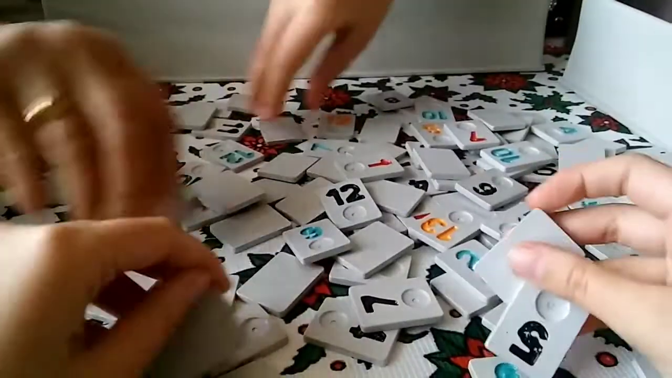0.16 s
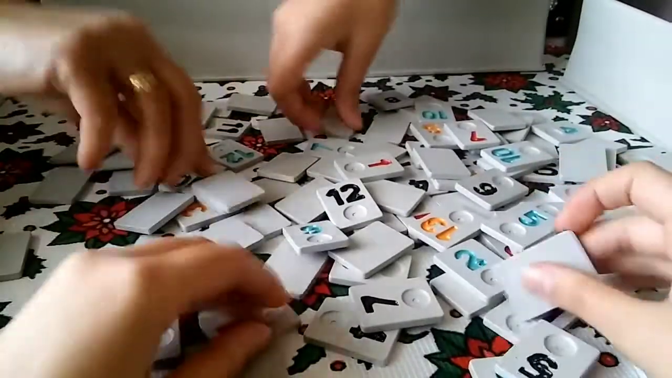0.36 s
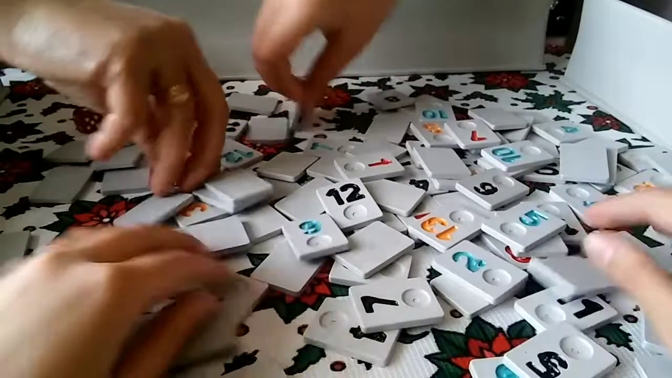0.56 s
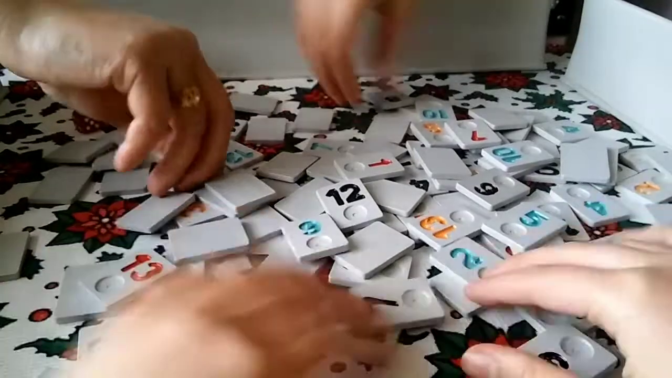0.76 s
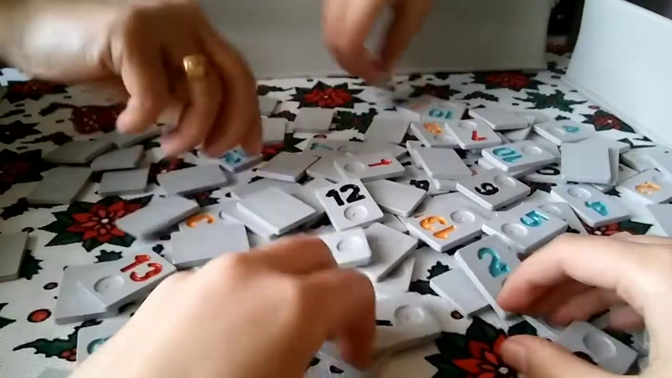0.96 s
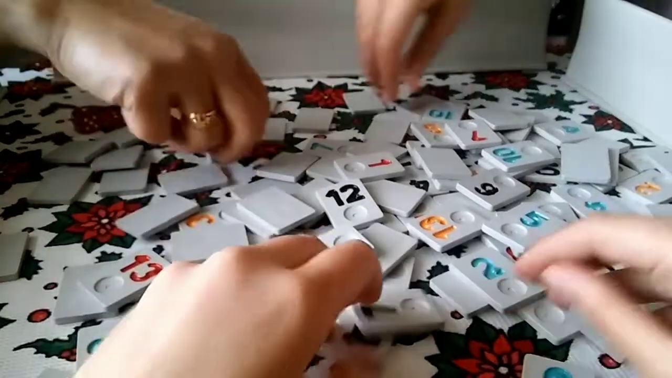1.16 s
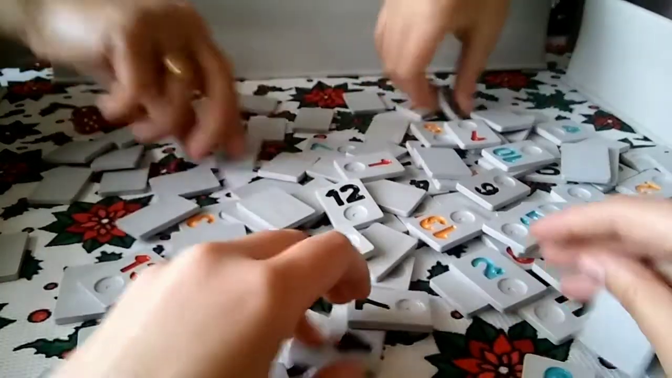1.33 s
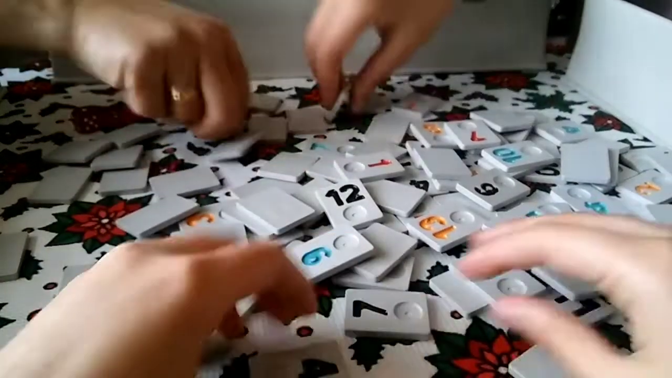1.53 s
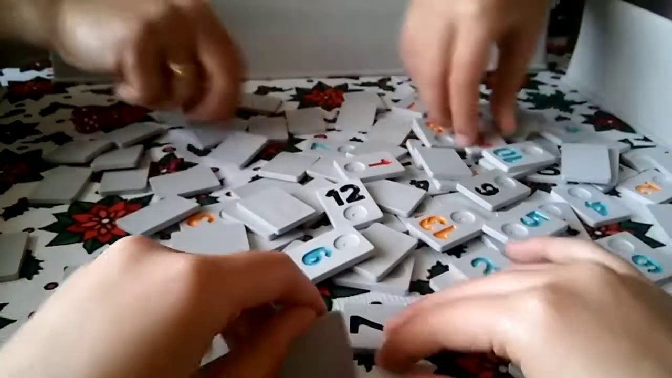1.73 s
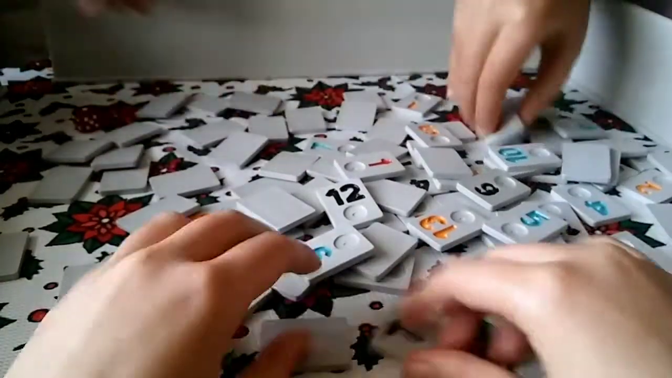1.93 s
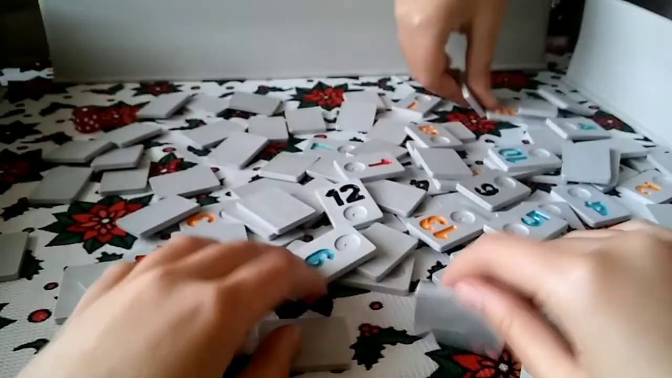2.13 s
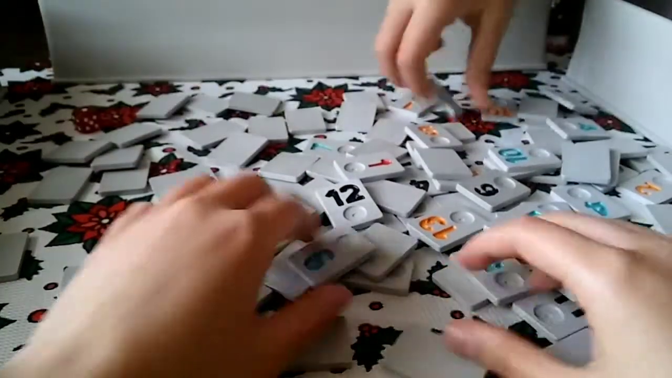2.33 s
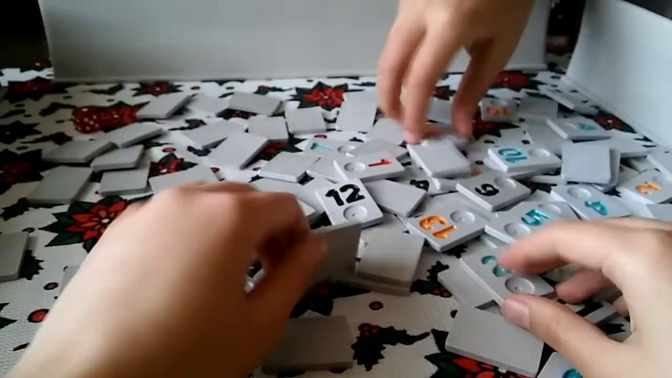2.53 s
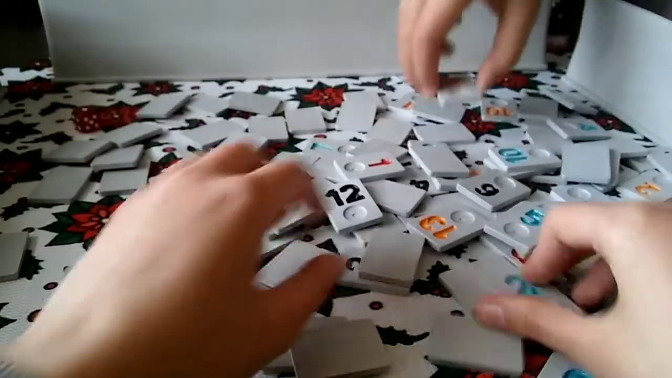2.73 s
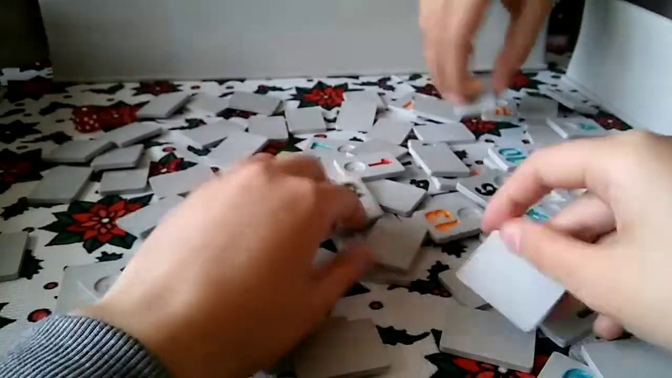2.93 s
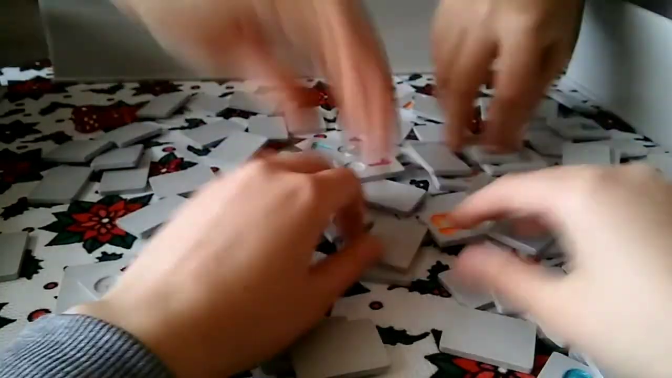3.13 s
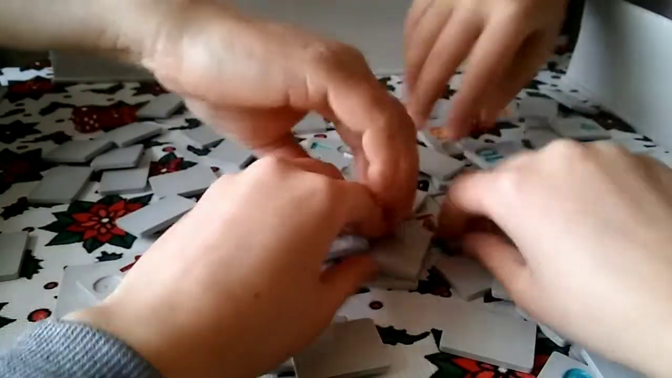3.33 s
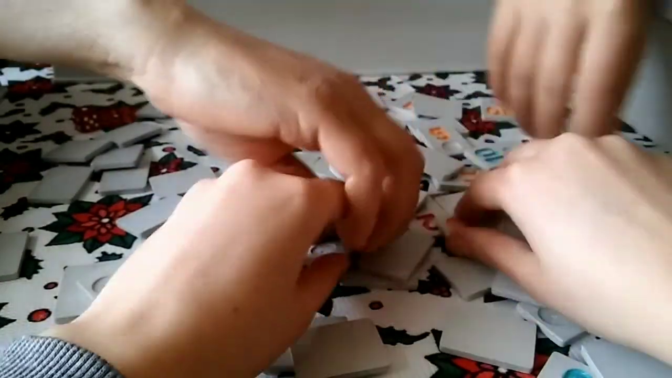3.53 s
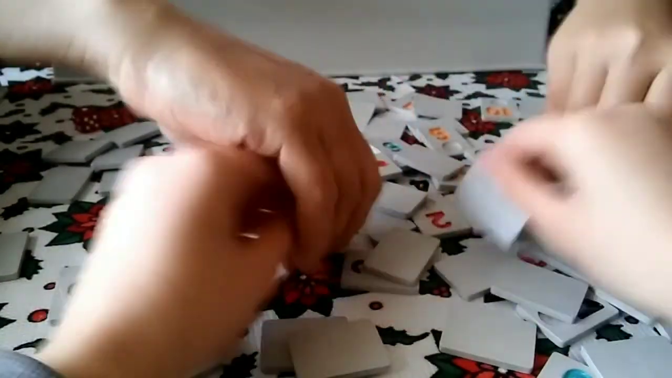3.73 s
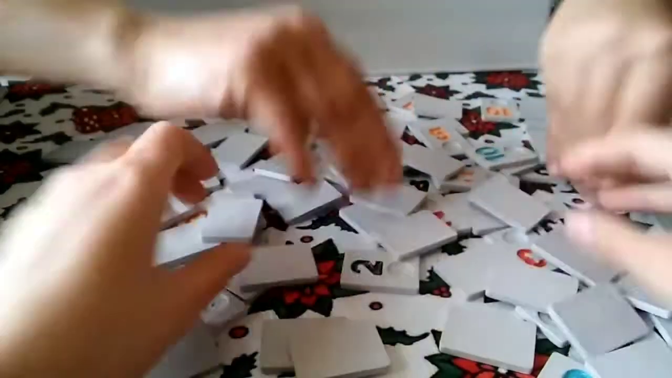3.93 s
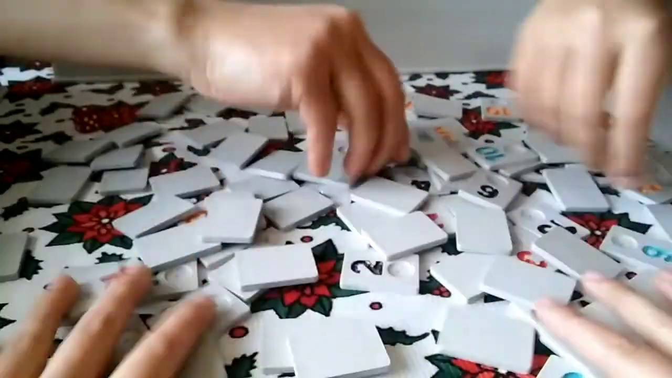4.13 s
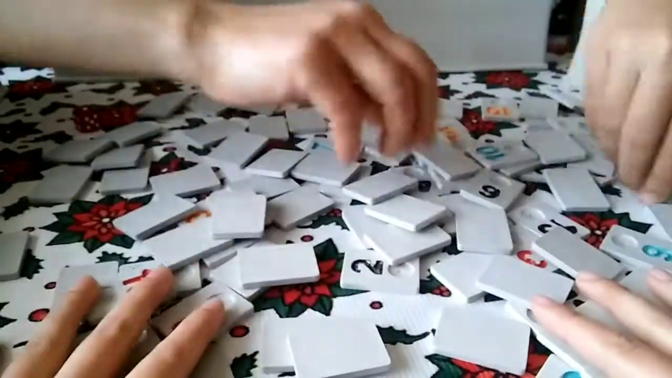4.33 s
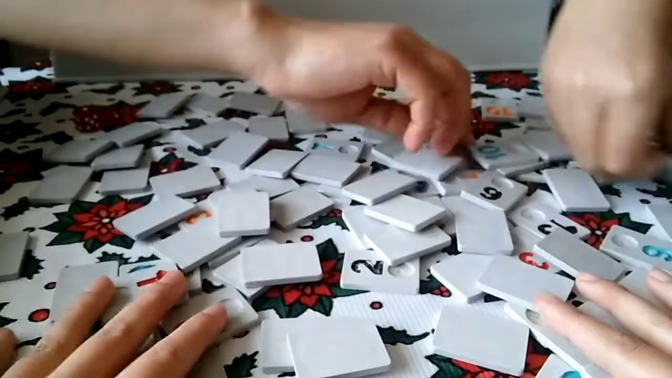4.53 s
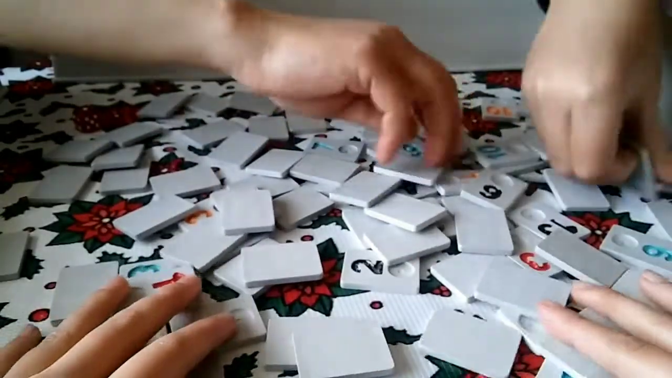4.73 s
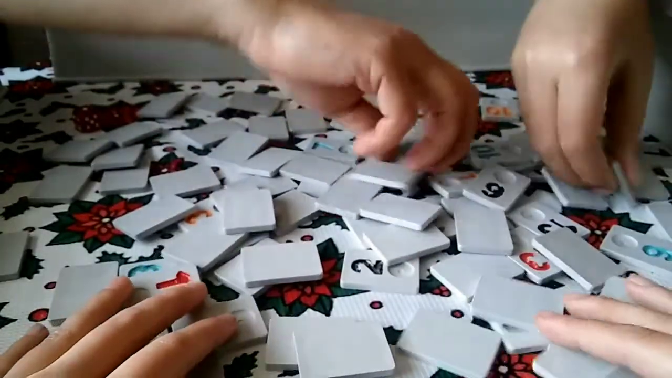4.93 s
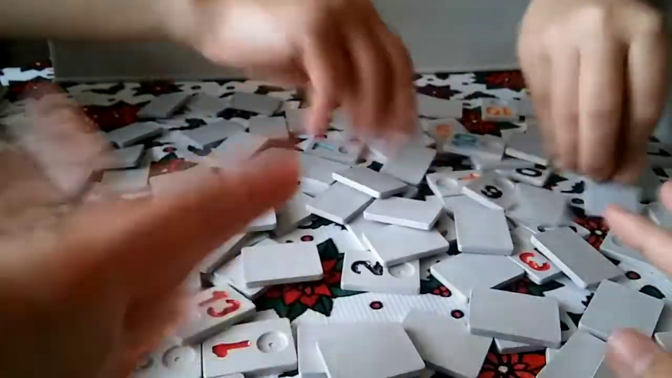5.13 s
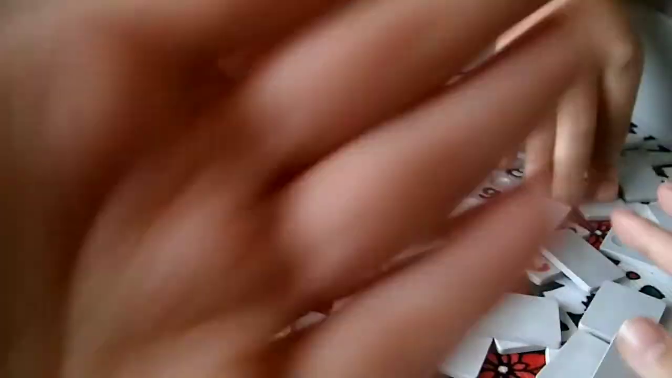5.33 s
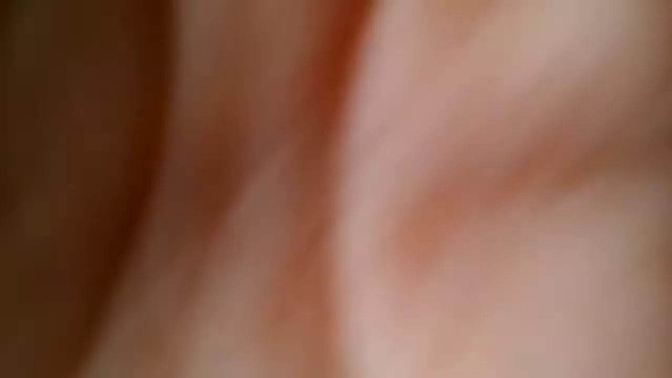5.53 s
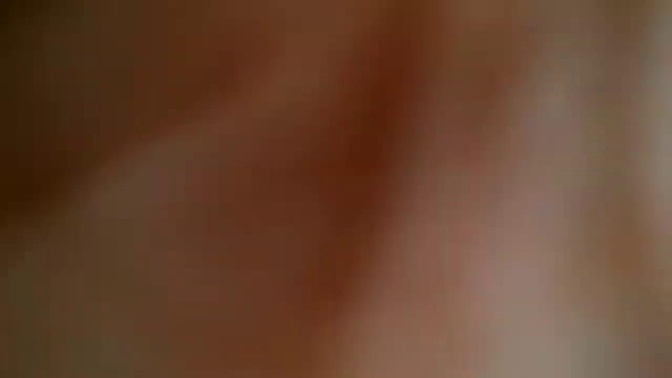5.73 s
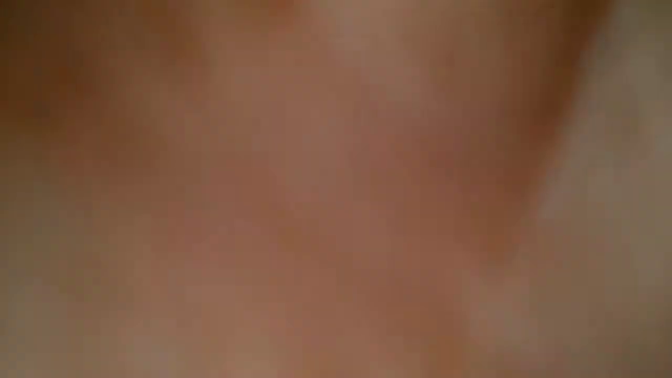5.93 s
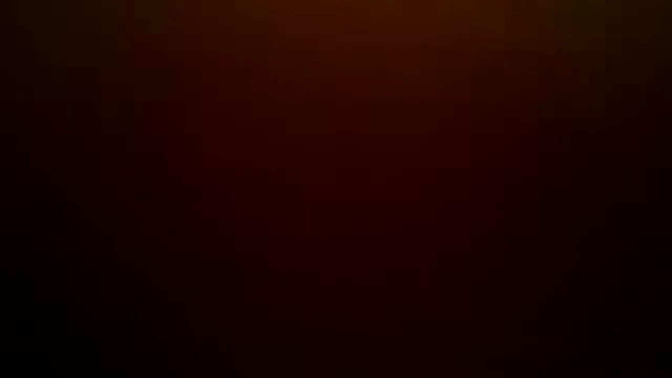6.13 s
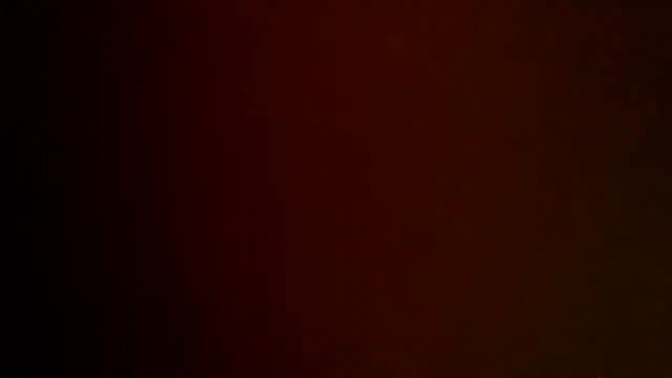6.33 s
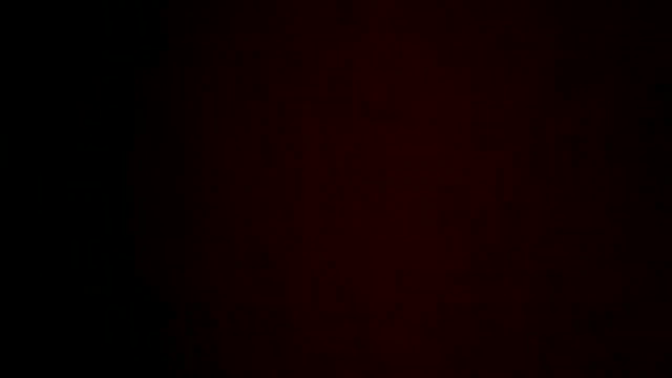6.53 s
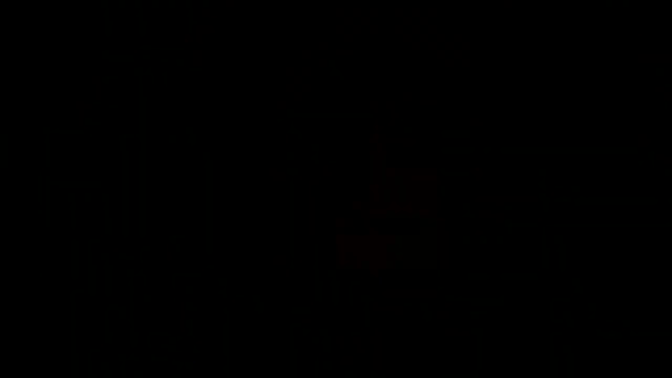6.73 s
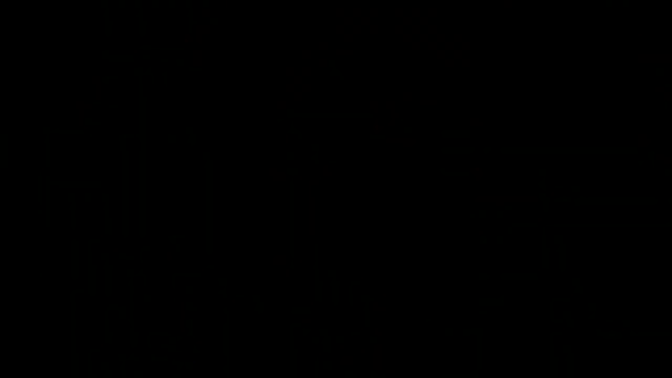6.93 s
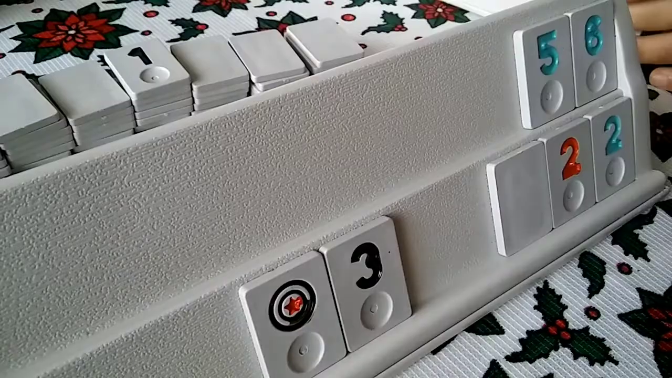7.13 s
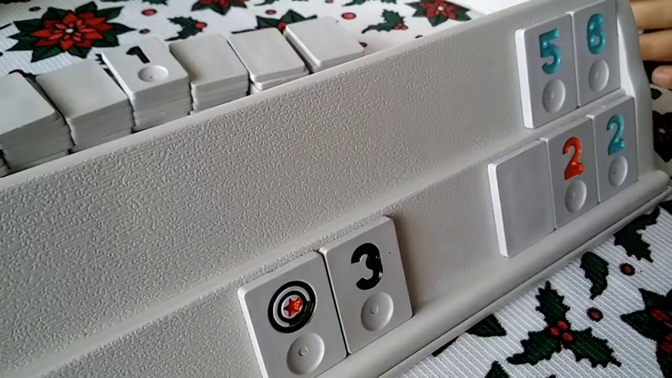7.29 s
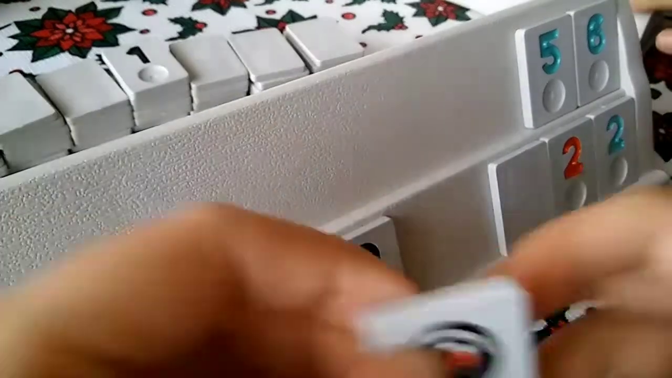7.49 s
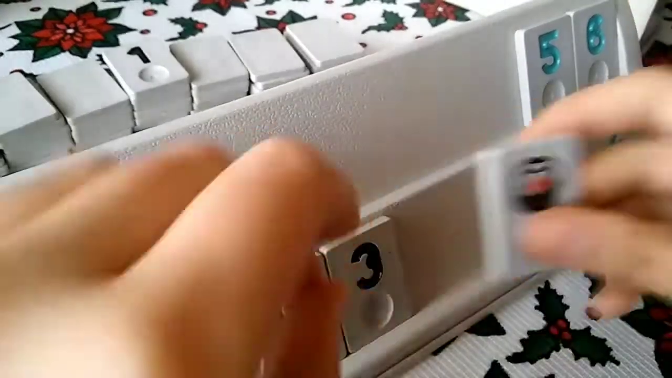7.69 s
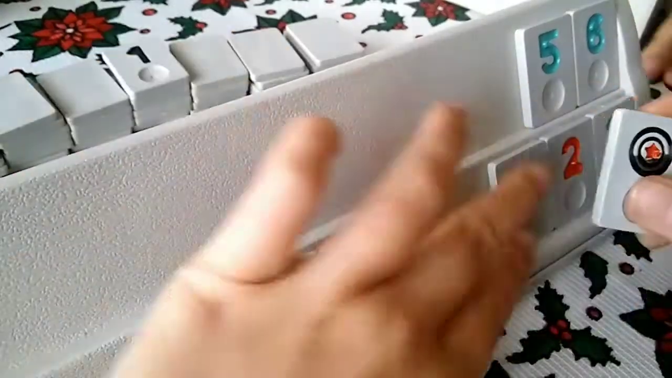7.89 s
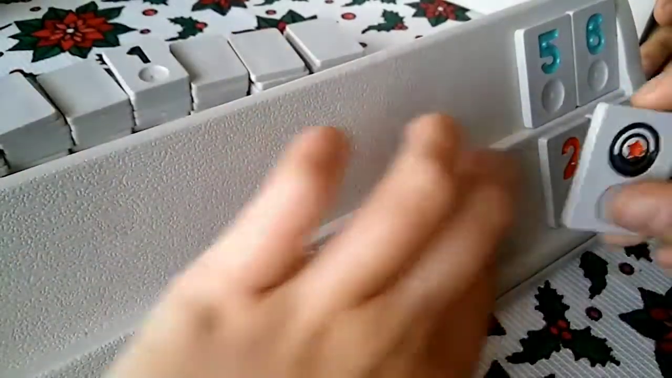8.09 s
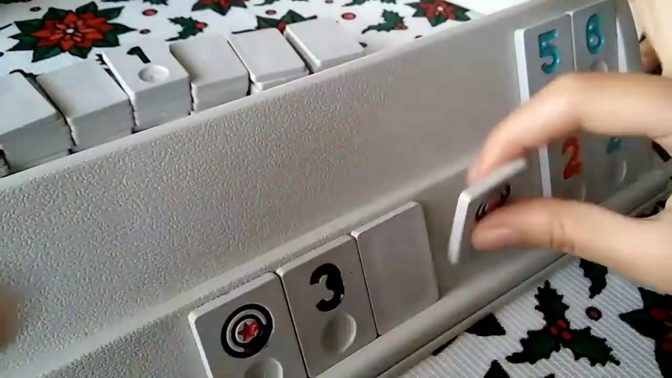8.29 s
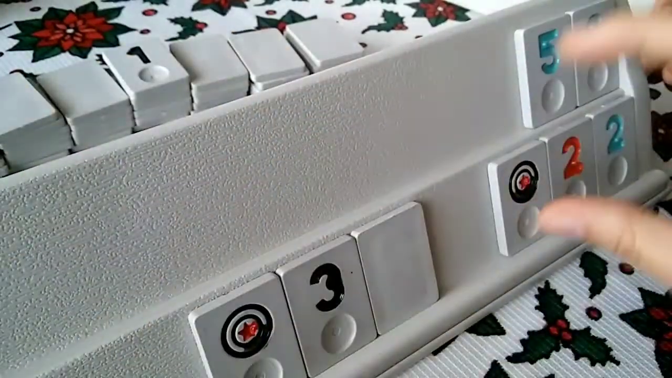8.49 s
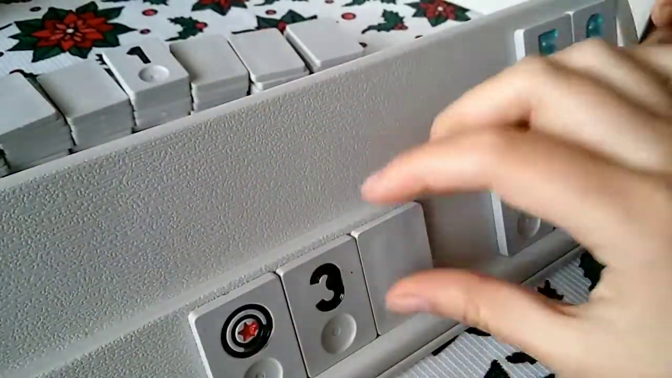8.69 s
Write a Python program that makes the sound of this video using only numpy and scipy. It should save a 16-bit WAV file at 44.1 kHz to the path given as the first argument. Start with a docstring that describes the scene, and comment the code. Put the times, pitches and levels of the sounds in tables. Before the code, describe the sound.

Hard plastic game tiles clatter and rattle as hands shuffle them on a cloth-covered table, then, after a blink of silence, tap a hollow rack.

```python
"""Hard plastic game tiles, shuffled and picked by several hands on a cloth-covered living-room table.
Clicks and knocks are bursts of tiny impacts ringing the modes of tile and table top; sliding rings the
tiles with random catches, over a low noise rumble, microphone shake and quiet room tone.
After a tenth of a second of silence, tiles tap, judder and rub on a hollow plastic rack close to the
microphone. Noise-built echoes surround it all, with a little stereo width in the treble."""
import sys
import numpy as np
from scipy import signal
from scipy.fft import rfft, irfft, next_fast_len
from scipy.io import wavfile
from scipy.ndimage import uniform_filter1d

SR = 44100
rng = np.random.default_rng(int(sys.argv[2]) if len(sys.argv) > 2 else 0)


def wav_record(signal):
    """Record a signal, one row per channel, as 16-bit PCM in the file named by sys.argv[1]."""
    frames = np.transpose(np.atleast_2d(signal))
    bounded = np.clip(frames, -1, 1)
    # unit amplitude maps onto the largest positive 16-bit level
    quanta = np.round(bounded * 32767).astype(np.int16)
    wavfile.write(sys.argv[1], SR, quanta)


N = 385875

# Levels in the tables and settings are relative: each layer is trimmed by the arguments in scene().
SILENCE_START_S, SILENCE_END_S = 7.057, 7.16
BLOW_SIZE, LEAD_IN = 4096, 256   # samples in a blow, and of grazing before it lands
MODE_SPREAD_DB = 2.5   # how much the place of contact changes a mode's strength


def from_db(db):
    """Decibels to gain."""
    return 10 ** (np.asarray(db) / 20)


def rms_one(x):
    """Scale to rms 1."""
    return x / np.sqrt(np.mean(x ** 2) + 1e-30)


def in_time(rows):
    """Each column of a curve at every sample."""
    s, *columns = np.transpose(rows)
    return [np.interp(np.arange(N) / SR, s, c) for c in columns]


def at_hz(points, hz):
    """Read a table on a log-frequency axis."""
    table_hz, values = np.array(points).T
    return np.interp(np.log(np.maximum(hz, 1)), np.log(table_hz), values)


def cut(x, hz, kind):
    """Second-order low- or high-pass, or a band-pass with second-order sides."""
    return signal.sosfilt(signal.butter(2, hz, kind, fs=SR, output="sos"), x)


def coloured_noise(spectrum):
    """Steady noise of a given spectrum, rms 1."""
    size = next_fast_len(N)
    white = rfft(rng.standard_normal(size))
    shape = from_db(at_hz(spectrum, np.fft.rfftfreq(size, 1 / SR)))
    return rms_one(irfft(white * shape, size)[:N])


def ring(force, modes, tune=1., spread_db=0., detune=0.):
    """A force rings a set of modes; the place of contact shifts each one's strength and pitch. Rms 1."""
    out = 0
    for k, (hz, width_hz, db) in enumerate(modes):
        mode_hz = hz * tune * (1 + detune * rng.standard_normal())
        w = 2 * np.pi * min(mode_hz, SR / 2 - 1000) / SR
        r = np.exp(-np.pi * width_hz / SR)
        mode = signal.lfilter([1, 0, -1], [1, -2 * r * np.cos(w), r * r], force + 1e-18)
        out = out + (-1) ** k * rms_one(mode) * from_db(db + spread_db * rng.standard_normal())
    return rms_one(out)


def contact(chatter_s, settle_db, settle_s, graze_db, rise_s):
    """Force of one blow: the edge grazes, lands in a flurry of tiny impacts, then settles with weaker ones."""
    t = (np.arange(BLOW_SIZE) - LEAD_IN) / SR
    after = np.maximum(t, 0)
    # no two blows chatter or graze alike
    chatter_s = chatter_s * np.exp(rng.normal(0, .3))
    graze_db = graze_db + rng.normal(0, 4)
    impacts = rng.standard_normal(BLOW_SIZE) * (rng.random(BLOW_SIZE) < .4)
    decay = np.exp(-after / chatter_s) + from_db(settle_db) * np.exp(-after / settle_s)
    landing = (1 - np.exp(-after / rise_s)) * decay
    graze = from_db(graze_db) * np.exp(-np.abs(t) / .0022)
    return impacts * (landing + graze)


def add(track, s, blow):
    """Lay a blow on the track; its level counts as if all its energy came within 5 ms."""
    start = max(round(s * SR) - LEAD_IN, 0)
    track[start:start + BLOW_SIZE] += blow[:N - start] * np.sqrt(.005 * SR / BLOW_SIZE)


def grains(per_s, size_db):
    """Random tiny impacts of uneven size."""
    sizes = from_db(size_db * np.minimum(rng.exponential(1, N), 4)) * rng.choice([-1, 1], N)
    return sizes * (rng.random(N) < per_s / SR)


def strokes(rows, swell, release_s):
    """Gain of strokes (start s, length s, dB): each swells over a share of its length, holds and dies away."""
    out = np.zeros(N)
    for start, length, db in rows:
        first = max(int(start * SR), 0)
        age = np.arange(min(int((length + 10 * release_s) * SR), N - first)) / SR
        rise = np.minimum(age / (swell * length), 1)
        fall = np.exp(-np.maximum(age - length, 0) / release_s)
        out[first:first + len(age)] += from_db(db) * rise * fall
    return out


def scattered(gain, spread_db, count):
    """Chance contacts all through the shuffle, stronger where the hands are busier: rows (s, gain)."""
    times = (np.arange(count) + rng.random(count)) * (SILENCE_START_S - .05) / count
    uneven = from_db(spread_db * np.clip(rng.standard_normal(count), -2, 2))
    return zip(times, gain[(times * SR).astype(int)] * uneven)


# quiet background of the room: (frequency [Hz], spectral density [dB])
ROOM_TONE_SPECTRUM = [(15, -34.5), (25, 7), (134, -3.5), (301, -8), (560, -10), (818, -15.5), (1190, -30.5),
                      (2110, -23), (3620, -29), (4740, -34), (6050, -28.5), (8360, -35.5), (16000, -40.5)]
ROOM_TONE_DB = -68.5


def room_tone():
    """Steady noise, shaped like the quiet room."""
    return from_db(ROOM_TONE_DB) * coloured_noise(ROOM_TONE_SPECTRUM)


# hands push through the heap: (start [s], length [s], rattle level [dB], cloth-scrape level [dB])
HAND_PUSHES = [(0, 0.088, -63, -53.5), (0.247, 0.42, -49.5, -50), (0.773, 0.26, -52, -55.5),
               (1.25, 0.24, -52.5, -53), (1.507, 0.51, -39, -45), (2.051, 0.16, -52.5, -56),
               (2.33, 0.039, -59.5, -44.5), (2.423, 0.23, -39.5, -56), (2.679, 0.14, -60.5, -56.5),
               (2.944, 0.39, -40, -50.0), (3.377, 0.17, -56.5, -57.5), (3.665, 0.26, -41.5, -52),
               (3.926, 0.4, -33, -46.5), (4.383, 0.3, -45, -53.5), (4.811, 0.054, -33, -52),
               (4.959, 0.17, -42.5, -60.5), (5.089, 0.25, -35.5, -51), (5.489, 0.03, -46.5, -50.5),
               (5.699, 0.19, -57, -54.5), (6.32, 0.072, -71, -64), (6.546, 0.17, -52, -51.5),
               (6.773, 0.34, -48.5, -53)]
# fingers feel about between the pushes: (time [s], level [dB])
FINGER_FIDGET = [(0, -58), (2.2, -60.5), (3.6, -68), (5.4, -64.5), (5.65, -73.5), (6.1, -75), (6.5, -72.5),
                 (7.05, -63.5)]
# tile against tile: (time [s], main ring level [dB], lower modes re main [dB], upper modes re main [dB])
CLICK_EVENTS = [(0.077, -30.5, -6, -12), (0.107, -30.0, 5, -2.5), (0.272, -35.5, 1.5, -26),
                (0.295, -17, -9, -9), (0.333, -27, -2, -18), (0.351, -19.5, -7, -8.5),
                (0.385, -23.5, -2, -6), (0.422, -19.5, -3, -1.5), (0.526, -20, -6.5, -8),
                (0.59, -31.5, -0.5, -5), (0.599, -23, -9, -7), (0.64, -28, -3, -4), (0.782, -32.5, -2, -29),
                (0.818, -24.5, 0, -5), (0.828, -29, 3.5, 0.0), (0.899, -31.5, -7.5, -16),
                (0.941, -39, 10, -12.5), (0.966, -13.5, -7.5, -8), (1.083, -46, -6.5, -13.5),
                (1.22, -46.5, 4, -29), (1.316, -28, -3, -6.5), (1.388, -44.5, 9, -15),
                (1.414, -33.5, 3, -1.5), (1.427, -33.5, -9, -2.5), (1.504, -32, 8, -11.5),
                (1.549, -13, -2.5, -3.5), (1.577, -22.5, -8.5, -11.0), (1.654, -30.5, -4, -15),
                (1.706, -22.5, -1.5, -3), (1.75, -28, -16, -33), (1.801, -26.5, -2, -10),
                (1.842, -26.5, -8.5, -12), (1.944, -21, -3.5, -14), (1.97, -18, -10, -11.5),
                (2.009, -27, -5, -15), (2.095, -35, -1, -21), (2.223, -22.5, -10.5, -8.5),
                (2.251, -27.5, -11.5, -14.5), (2.431, -29.5, -1.5, 2), (2.45, -13, -10.5, -11),
                (2.493, -20.5, -8.0, -10), (2.593, -26, -9.5, -9.5), (2.712, -20.5, -5, -9),
                (2.731, -12.5, -12, -3), (2.752, -24.5, -12, -14), (2.967, -34.5, 3, -10),
                (3.019, -29.5, -1.0, -24), (3.065, -28.5, 6, -4.5), (3.122, -16.5, -4.5, -4),
                (3.171, -16.5, -6.5, -0.5), (3.295, -23.5, -3.5, -10.5), (3.433, -39.5, 5.5, -11),
                (3.544, -43.5, 4.5, -28), (3.734, -24.0, -9, -8), (3.77, -30.5, 0.5, -16.0),
                (3.818, -16.5, -7.5, -9.5), (3.872, -22, -4.5, -11.5), (3.938, -20, -10, -2.5),
                (3.949, -9.5, -13.5, -3.5), (3.965, -15.5, -9, -7.5), (3.989, -11, -10.5, -14.5),
                (3.996, -18.5, -22, -14.5), (4.025, -23.5, -7.5, -14), (4.045, -25.5, -7.5, 4.5),
                (4.089, -18, -9.5, -14), (4.119, -26, 2.5, -5.5), (4.149, -26, 1, -3.5),
                (4.173, -18.5, -6.5, -2.5), (4.187, -18, -4.0, -1), (4.212, -20.5, -6, -18),
                (4.291, -17.5, -6, -8.5), (4.311, -21, -5.5, -3), (4.397, -34.5, -2, -1),
                (4.478, -19, -11, -9), (4.513, -27, -1.5, -12), (4.56, -21.0, -7, -11.5),
                (4.636, -26.5, -0.5, -10), (4.826, -26.5, -2.5, 0.5), (4.857, -27.5, -1, -16),
                (5.011, -29.5, -5, -2.0), (5.093, -27.5, -6, -11.0), (5.138, -29, -3.5, -7),
                (5.19, -15, -5.5, -17.5), (5.215, -18.0, -8.5, -13), (5.327, -23.5, 1.5, -1.0),
                (5.52, -30, 1.5, -43), (5.772, -50, 12, -37), (5.812, -49.5, 9.5, -19.5),
                (5.871, -35.5, 2, -20), (6.424, -60, 11.5, -29), (6.563, -17.5, -8, -14),
                (6.657, -22, -5, -12.5), (6.681, -22.5, -5, -10.5), (6.774, -24.5, -2.5, -1),
                (6.799, -19, -9.0, -15), (6.938, -24, -1.5, -1), (6.96, -26.5, -2.5, -16)]
PUSH_SWELL, PUSH_RELEASE_S = 0.12, 0.027   # share of a push that it takes to build up; time to die away
LULL_S, LULL_DB = .03, -4   # the sliding lets up while a tile tips over, just before it clicks


def hand_work(idle_rattle_db, idle_cloth_db, cloth_lull_db):
    """Gains of rattling and scraping: pushes on top of the fingers' fidgeting, with a lull before each click."""
    fidget, = in_time(FINGER_FIDGET)
    pushes = np.array(HAND_PUSHES)
    rattle = strokes(pushes[:, [0, 1, 2]], PUSH_SWELL, PUSH_RELEASE_S)
    rattle = rattle + from_db(fidget + idle_rattle_db)
    cloth = strokes(pushes[:, [0, 1, 3]], PUSH_SWELL, PUSH_RELEASE_S)
    cloth = np.hypot(cloth, from_db(fidget + idle_cloth_db))
    before_clicks = [(s - LULL_S, LULL_S, 0) for s, *_ in CLICK_EVENTS]
    lull = np.minimum(strokes(before_clicks, swell=.15, release_s=0.0012), 1)
    return rattle * from_db(LULL_DB * lull), cloth * from_db(cloth_lull_db * lull)


# modes of a tile, in three registers: (frequency [Hz], width [Hz], level [dB])
TILE_LOW_MODES = [(2580, 1350, -4), (3560, 140, 1), (4063, 87, -2), (4882, 340, 1.5)]
TILE_MAIN_MODES = [(5576, 140, -2.5), (6317, 210, 6), (6720, 670, -2)]
TILE_HIGH_MODES = [(7490, 1400, -1), (8330, 780, 2), (9733, 250, 1), (12540, 320, -9), (14700, 630, -16.5)]
# middle and upper modes of the table top under a tile: (frequency [Hz], width [Hz], level [dB])
TABLE_KNOCK_MODES = [(497, 34, -10.5), (733.3, 33, -8), (904, 76, -7)]
TABLE_CLACK_MODES = [(1234, 260, -0.5), (1440, 670, 1.5), (1972, 435, -1.5), (2440, 560, -11.5)]
# drumming of the table: (frequency [Hz], spectral density [dB])
RUMBLE_SPECTRUM = [(70, -16), (140, -18.5), (215, 3), (300, -7), (430, -6), (650, -30.5), (1200, -55.5)]


def shuffling(rattle, cloth, rattle_db, cloth_db, rumble_db, rumble_follows):
    """Pushed tiles catch on each other's edges in a fine rattle, scrape the cloth and drum on the table."""
    tiles, scrapes = 0, 0
    for tune in np.linspace(.95, 1.05, 4):
        # each tile sticks and slips: its catches come in short spurts
        spurts = from_db(4.5 * rms_one(cut(rng.standard_normal(N), 45, "low")))
        catches = grains(per_s=2500, size_db=0.5) * spurts
        tiles = tiles + ring(catches, TILE_LOW_MODES, tune)
        tiles = tiles + from_db(-2.0) * ring(catches, TILE_MAIN_MODES, tune)
        tiles = tiles + from_db(-18) * ring(catches, TILE_HIGH_MODES, tune)
        scrapes = scrapes + ring(catches, TABLE_KNOCK_MODES + TABLE_CLACK_MODES, tune)
    out = from_db(rattle_db) * rattle * rms_one(cut(tiles, [2000, 11000], "band"))
    out += from_db(cloth_db) * cloth * rms_one(cut(scrapes, 3200, "low"))
    out += from_db(rumble_db) * rms_one(cloth) ** rumble_follows * coloured_noise(RUMBLE_SPECTRUM)
    return out * (np.arange(N) < SILENCE_START_S * SR)


# arms lean on the table: (time [s], level [dB])
ARM_LEANING = [(0, -64), (.5, -51), (2.2, -57.5), (2.45, -50), (3.15, -45.5), (3.85, -55.5), (4.2, -50.5),
               (5.3, -58.5), (6.2, -60.5), (6.95, -50)]
# low shudder of the microphone: (frequency [Hz], spectral density [dB])
SHAKE_NOISE = [(15, -28.5), (30, -15.5), (55, -6.5), (95, 1), (140, -6), (260, -29.5), (600, -77.5)]
RACK_SHAKE_DB = -67.5   # steady shake once the shuffling is over


def microphone_shake(shake_db):
    """Arms leaning on the table shake the microphone: low noise, which stays faint and steady at the rack."""
    leaning, = in_time(ARM_LEANING)
    busy = np.arange(N) < SILENCE_START_S * SR
    level = np.where(busy, leaning, RACK_SHAKE_DB)
    return from_db(level + shake_db) * coloured_noise(SHAKE_NOISE)


# fainter clicks are duller, with less treble above 7.5 kHz
TREBLE_DB_PER_DB, TREBLE_SPLIT_HZ = 0.6928, 7500


def jostling(rattle, level_db, spread_db, upper_db, thud_db, count):
    """Pushed tiles nudge their neighbours: faint clicks, each with its own pitch, the fainter the duller."""
    out = np.zeros(N)
    usual = rattle.mean()
    for s, gain in scattered(rattle, spread_db, count):
        force = contact(chatter_s=.0012, settle_db=-26, settle_s=.008, graze_db=-30, rise_s=.0004)
        tick = ring(force, TILE_LOW_MODES + TILE_MAIN_MODES, spread_db=4, detune=.07)
        thud = ring(force, TABLE_KNOCK_MODES + TABLE_CLACK_MODES, spread_db=4.5, detune=.11)
        tick += from_db(thud_db) * thud
        tick = cut(cut(tick, TREBLE_SPLIT_HZ, "low"), TREBLE_SPLIT_HZ, "low")
        treble_gain = from_db(upper_db) * (gain / usual) ** TREBLE_DB_PER_DB
        tick += treble_gain * ring(force, TILE_HIGH_MODES, spread_db=6, detune=0.018)
        add(out, s, from_db(level_db) * gain * tick)
    return out


# tile or fingertip on the table: (time [s], knock level [dB], boom re knock [dB], clack re knock [dB])
KNOCK_EVENTS = [(0.01, -38, -11, -11), (0.12, -46.5, 9, 8), (0.182, -27, -5.5, -2),
                (0.268, -31.5, -2, -1.5), (0.293, -39, 11.5, 3), (0.602, -42.5, 10, 2.5),
                (0.682, -26.5, -6.5, -2.5), (0.811, -43.5, 15.5, -1), (0.971, -36.5, 9, 2.5),
                (1.156, -29, -1.5, 0.5), (1.318, -36.5, 7.5, -3.5), (1.388, -30, -2, 4.5),
                (1.505, -38.5, 4.5, -11), (1.55, -27.5, -3.5, -6), (1.655, -38.5, 5, 1.5),
                (1.707, -33.5, 2.5, 3.5), (1.827, -37.5, 1, 2.5), (2.319, -27.5, -2.5, -5),
                (2.357, -41, -8, -1), (2.438, -42.5, 13.5, -6), (2.964, -44, 15.5, -1.5),
                (3.065, -44.5, 13.5, 16), (3.122, -39.5, 9.5, 12.5), (3.292, -35, 2, 1),
                (3.836, -38, -9.5, -1.5), (3.953, -32.0, 1, 7), (4.111, -31.0, -1, 2.5), (4.22, -37, 3, -3),
                (4.287, -26, -9, 0), (4.844, -50.5, 13, 10), (5.191, -37.5, -10.5, 7),
                (5.214, -35.5, 0.5, -7), (5.29, -46, 21, -11), (5.334, -19.5, -0.5, -0.5),
                (5.721, -38.5, 0, -11.5), (5.844, -23.5, -8.5, 2), (5.964, -29.5, -4, 3.5),
                (6.218, -50.5, -7, -3.5), (6.563, -29.5, 0.5, -8), (6.776, -46.5, 7.5, 6.5)]
# low modes of the table top: (frequency [Hz], width [Hz], level [dB])
TABLE_BOOM_MODES = [(120, 87, -6), (228.4, 40, 6), (241.8, 51, -1), (292, 16, -4), (360, 139, 2.5),
                    (406, 80, -2.5)]


def table_knocks(knock_db, boom_db, clack_db, crack_db):
    """The cloth softens a landing: a dull knock, the table top's short boom and a faint crack of the tile."""
    out = np.zeros(N)
    for s, db, low_db, high_db in KNOCK_EVENTS:
        force = contact(chatter_s=.0013, settle_db=-18, settle_s=.008, graze_db=-27, rise_s=.0003)
        knock = ring(force, TABLE_KNOCK_MODES, spread_db=MODE_SPREAD_DB, detune=0.029)
        boom = ring(force, TABLE_BOOM_MODES, spread_db=MODE_SPREAD_DB, detune=0.06)
        clack = ring(force, TABLE_CLACK_MODES, spread_db=MODE_SPREAD_DB, detune=.035)
        crack = ring(force, TILE_LOW_MODES + TILE_MAIN_MODES, spread_db=MODE_SPREAD_DB, detune=.025)
        table = from_db(knock_db) * knock + from_db(low_db + boom_db) * boom
        table += from_db(high_db + clack_db) * clack
        tile = from_db(high_db + crack_db) * crack
        add(out, s, from_db(db) * (cut(table, 4800, "low") + cut(tile, [2000, 6500], "band")))
    return out


def bumping(cloth, level_db, spread_db, knock_db, count):
    """Tiles slip off each other and drop flat on the cloth: small, dull bumps ring the table top."""
    out = np.zeros(N)
    for s, gain in scattered(cloth, spread_db, count):
        force = contact(chatter_s=.0013, settle_db=-18, settle_s=.008, graze_db=-27, rise_s=.0003)
        bump = ring(force, TABLE_BOOM_MODES, spread_db=MODE_SPREAD_DB, detune=0.03)
        knock = ring(force, TABLE_KNOCK_MODES + TABLE_CLACK_MODES, spread_db=4.5, detune=.07)
        bump += from_db(knock_db) * knock
        add(out, s, from_db(level_db) * gain * bump)
    return out


# a struck tile rocks back and touches its neighbour once more, after 0.5 to 2 times this delay
REBOUND_S, REBOUND_DB = 0.011, -11.5
TILE_DETUNE = 0.023   # spread of the main ring's pitch from tile to tile, as a share


def tile_clicks(main_db, lower_db, upper_db, thud_db, pitch_hz):
    """Every tile rings a little differently, passes a faint thud to the table below and rebounds once."""
    out = np.zeros(N)
    table_modes = TABLE_BOOM_MODES + TABLE_KNOCK_MODES + TABLE_CLACK_MODES
    for s, db, low_db, high_db in CLICK_EVENTS:
        # pitch_hz is where the strongest main mode lies on average
        tune = pitch_hz / TILE_MAIN_MODES[1][0] * (1 + TILE_DETUNE * rng.standard_normal())
        for delay_s, loss_db in (0, 0), (REBOUND_S * rng.uniform(.5, 2), REBOUND_DB):
            force = contact(chatter_s=.0013, settle_db=-22, settle_s=.011, graze_db=-25, rise_s=.0008)
            main = ring(force, TILE_MAIN_MODES, tune, spread_db=MODE_SPREAD_DB, detune=0.02)
            low = ring(force, TILE_LOW_MODES, spread_db=0.5, detune=0.037)
            high = ring(force, TILE_HIGH_MODES, spread_db=6.5, detune=0.025)
            thud = ring(force, table_modes, spread_db=5.5, detune=0.087)
            tile = from_db(main_db) * main + from_db(low_db + lower_db) * low
            tile += from_db(high_db + upper_db) * high
            click = cut(tile, 2000, "high") + from_db(thud_db) * thud
            add(out, s + delay_s, from_db(db + loss_db) * click)
    return out


# one tile eased softly over another: (time [s], level [dB])
SLIDE_LEVEL = [(6.1, -94.5), (6.22, -63), (6.33, -74.5), (6.45, -73), (6.55, -65), (6.6, -100)]


def soft_slide():
    """Light friction wakes only the tile's main ring."""
    level, = in_time(SLIDE_LEVEL)
    slide = ring(grains(per_s=4000, size_db=2.5), TILE_MAIN_MODES)
    return from_db(level) * cut(slide, [4500, 7500], "band")


# a tile judders down the rack in a run of quick, dull slips
JUDDER_START_S, SLIP_S, SLIP_DB, SLIP_EDGE_DB = 8.246, .007, -31, -19


def judder(count):
    """Nearly even slips of uneven strength, as rows of taps."""
    rows = []
    for k in range(count):
        s = JUDDER_START_S + SLIP_S * (k + rng.normal(0, .12))
        rows.append((s, SLIP_DB + rng.uniform(-2, 2), SLIP_EDGE_DB))
    return rows


# tile on the rack: (time [s], hollow body level [dB], hard edge re body [dB])
TAP_EVENTS = [(7.163, -65.5, -15), (7.405, -46, -26.5), (7.48, -29, 1.5), (7.682, -42.5, -7),
              (7.688, -45.5, 7.5), (8.096, -53.5, -6), (8.125, -40.5, 0), (8.301, -35, 5.5),
              (8.306, -30, -5.5), (8.312, -33, -5.5), (8.342, -48, -5), (8.39, -51.5, -13)]
# modes of the rack's hollow body and hard edge: (frequency [Hz], width [Hz], level [dB])
RACK_BODY_MODES = [(370, 123, -6.5), (558, 120, -4), (765, 110, 2), (973, 77, -1.5), (1160, 184, -0.5)]
RACK_EDGE_MODES = [(1790, 180, -8), (2300, 1250, -3), (2960, 170, -8), (3850, 1300, -2.5),
                   (4286, 180, -0.5), (5620, 2130, 6), (6500, 2300, 4), (9300, 2600, -21.5)]


def rack_touches(body_db, edge_db):
    """Tiles tap the hollow rack, or judder down it in a run of quick slips, ringing its body and edge."""
    out = np.zeros(N)
    for s, db, hard_db in list(TAP_EVENTS) + judder(count=6):
        force = contact(chatter_s=.0013, settle_db=-19, settle_s=.009, graze_db=-26, rise_s=.0006)
        body = from_db(body_db) * ring(force, RACK_BODY_MODES, spread_db=MODE_SPREAD_DB, detune=.01)
        edge = ring(force, RACK_EDGE_MODES, spread_db=MODE_SPREAD_DB, detune=0.085)
        edge = from_db(hard_db + edge_db) * edge
        add(out, s, from_db(db) * (cut(body, [240, 2500], "band") + cut(edge, 8700, "low")))
    return cut(out, 169, "high")


# fingers and tiles drag along the rack: (start [s], length [s], level [dB])
RUB_STROKES = [(7.39, 0.087, -63.5), (7.67, 0.045, -53), (7.92, 0.24, -56.5), (8.24, 0.074, -56),
               (8.34, 0.063, -62), (8.66, 0.065, -68)]
RUB_SWELL, RUB_RELEASE_S = .6, .017   # share of a rub that it takes to build up; time to die away


def brushing(brush_db, edge_db, spurt_db):
    """Fingers and tiles dragging on the rack's finely grained face, catching and slipping in spurts."""
    friction = grains(per_s=12000, size_db=1.5)
    spurts = np.clip(rms_one(cut(rng.standard_normal(N), 60, "low")), -2, 2)
    friction = friction * from_db(spurt_db * spurts)
    rub = ring(friction, RACK_BODY_MODES) + from_db(edge_db) * ring(friction, RACK_EDGE_MODES)
    return from_db(brush_db) * strokes(RUB_STROKES, RUB_SWELL, RUB_RELEASE_S) * cut(rub, [300, 7000], "band")


# reverberation of the room: (frequency [Hz], time to fall by 60 dB [s])
REVERB_TIME = [(150, 0.26), (500, 0.15), (1500, 0.16), (4000, 0.092), (7000, 0.058), (14000, 0.13)]


def echo_pattern(near_db, near_s, tail_db):
    """Quick reflections off the table and racks, then a tail whose bands each die at their own rate."""
    t = np.arange(SR // 2) / SR
    edges = np.geomspace(60, 18000, 10)
    white = rng.standard_normal(len(t))
    tail = 0
    for low, high in zip(edges, edges[1:]):
        decay = from_db(-60 * t / at_hz(REVERB_TIME, np.sqrt(low * high)))
        tail = tail + cut(white, [low, high], "band") * decay
    tail = cut(rms_one(tail * (t > .007)), 9900, "low")   # cloth and furniture soak up the top
    near = rng.standard_normal(len(t)) * (t > .0015) * np.exp(-t / near_s)
    return (from_db(near_db) * rms_one(near) + from_db(tail_db) * tail) / np.sqrt(len(t))


def room(x, near_db, near_s, tail_db, count=4):
    """Echoes only. The sounds wander between spots on the table, and each spot has its own echo pattern."""
    spot = np.arange(N) / SR / .03   # on to the next spot every 30 ms
    out = 0
    for k in range(count):
        share = np.sin(np.pi / 2 * np.minimum((spot - k) % count, 2))
        out = out + signal.oaconvolve(x * share, echo_pattern(near_db, near_s, tail_db))[:N]
    return out


def scene():
    """Everything sounds from the middle; only treble reflections give a little width."""
    rattle, cloth = hand_work(idle_rattle_db=-4, idle_cloth_db=1.5, cloth_lull_db=-1.5)
    heap = shuffling(rattle, cloth, rattle_db=-3, cloth_db=-4.5, rumble_db=-52, rumble_follows=0.8)
    heap += microphone_shake(shake_db=-2.5)
    heap += jostling(rattle, level_db=5.0, spread_db=3.0, upper_db=-19.5, thud_db=-14.5, count=500)
    heap += table_knocks(knock_db=-1.0, boom_db=1.0, clack_db=1, crack_db=-11.5)
    heap += bumping(cloth, level_db=10, spread_db=5.5, knock_db=-5, count=90)
    heap += tile_clicks(main_db=1.0, lower_db=1.5, upper_db=1, thud_db=-17, pitch_hz=6168)
    heap += soft_slide()
    rack = rack_touches(body_db=2.5, edge_db=5.5)
    rack += brushing(brush_db=4.0, edge_db=-14.5, spurt_db=4.0)
    mid = heap + room(heap, near_db=-16.0, near_s=0.0025, tail_db=-13.0)
    # the rack is closer, so its tail is weaker
    mid += rack + room(rack, near_db=-5.5, near_s=0.0061, tail_db=-27)
    side = room(heap + rack, near_db=-18, near_s=.002, tail_db=-28, count=2)
    side = signal.sosfilt(signal.butter(10, 4600, "high", fs=SR, output="sos"), side)
    mid += room_tone()
    return np.array([mid + side, mid - side])


def record(dry):
    """The sound falls silent briefly; the highest peaks are rounded off and the top is cut above 16 kHz."""
    t = np.arange(N) / SR
    sounding = ((t < SILENCE_START_S) | (t > SILENCE_END_S)) * 1.
    sounding = uniform_filter1d(sounding, size=128)   # soft edges
    rounded = sounding * dry / (1 + (dry / .9) ** 4) ** .25
    return signal.sosfilt(signal.ellip(10, .2, 80, 16000, fs=SR, output="sos"), rounded)


dry = scene()
out = record(dry)
wav_record(out)
```